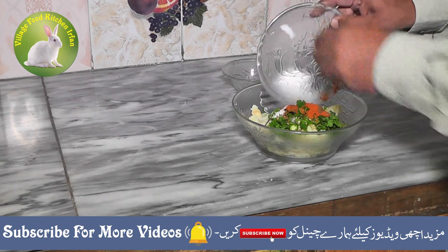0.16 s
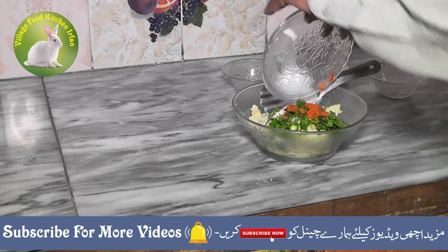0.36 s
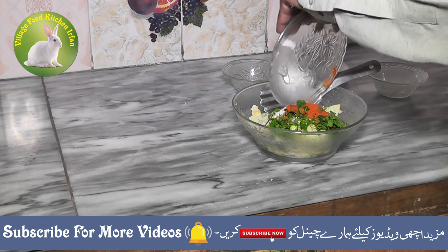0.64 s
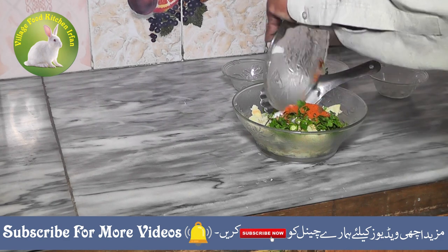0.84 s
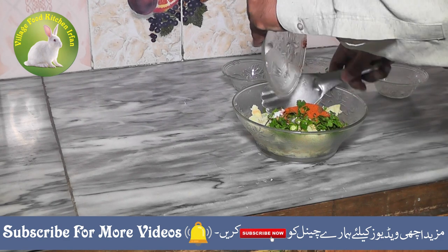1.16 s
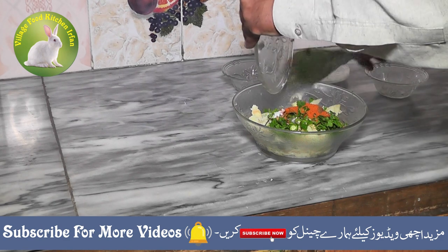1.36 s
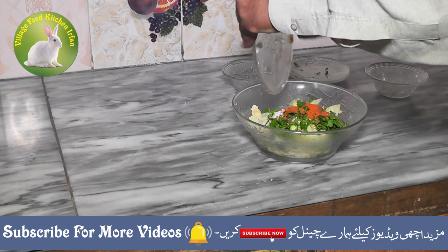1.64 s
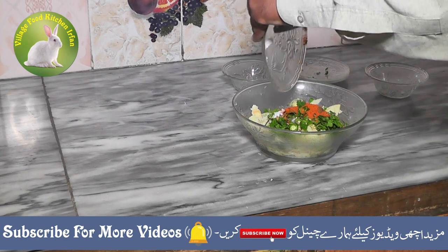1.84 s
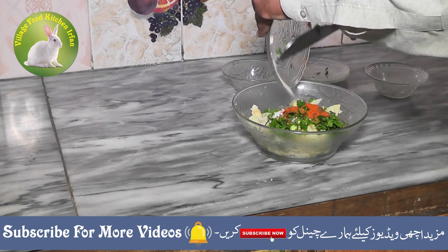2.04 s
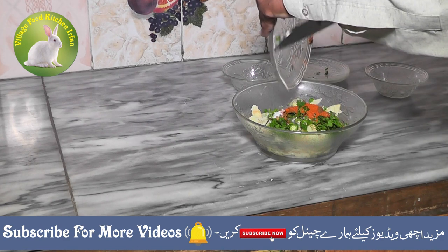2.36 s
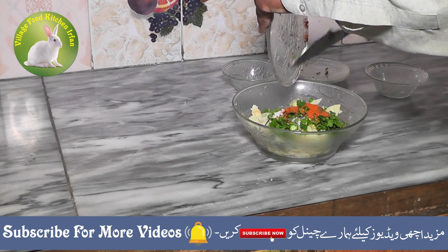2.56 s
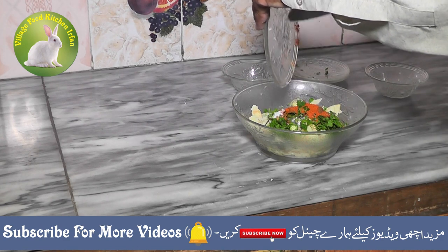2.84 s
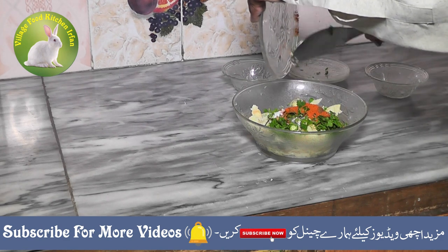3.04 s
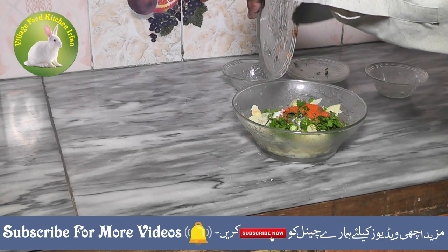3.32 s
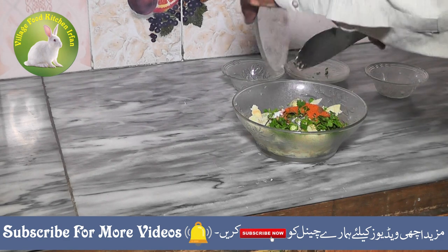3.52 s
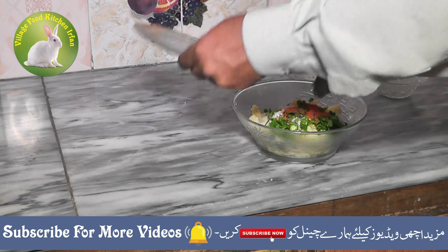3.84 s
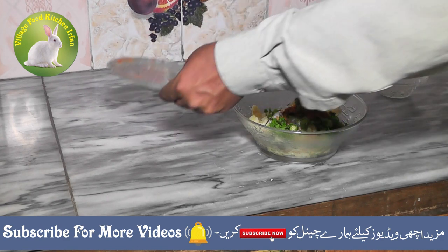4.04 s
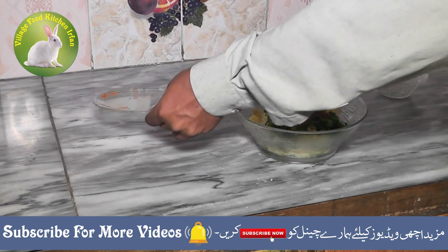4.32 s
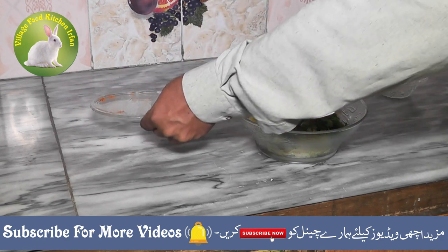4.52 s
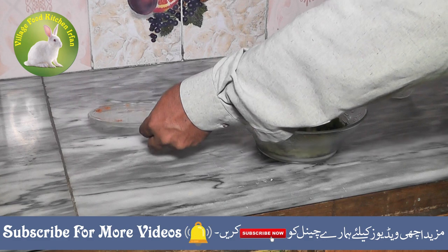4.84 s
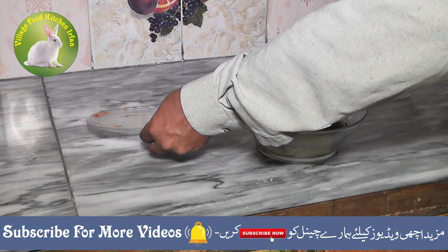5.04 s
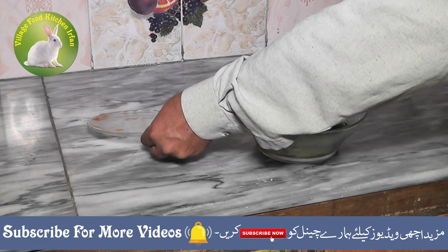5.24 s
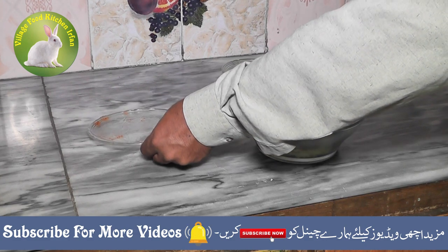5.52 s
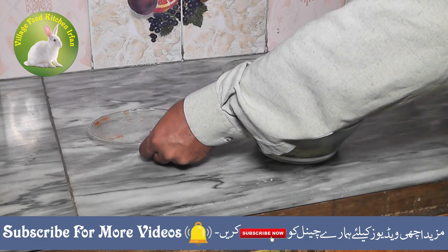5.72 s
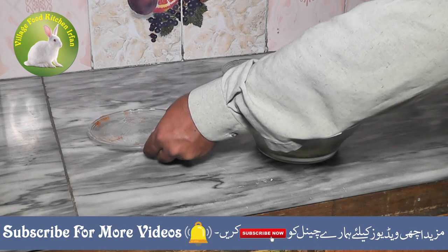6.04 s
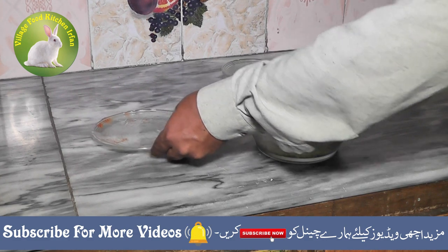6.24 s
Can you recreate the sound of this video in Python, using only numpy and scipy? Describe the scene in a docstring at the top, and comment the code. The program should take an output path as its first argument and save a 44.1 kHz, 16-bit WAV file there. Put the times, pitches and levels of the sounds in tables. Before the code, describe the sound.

In a quiet tiled kitchen, ringing metal-on-glass taps and short scrapes give way to a glass plate landing and rocking on stone.

```python
"""A faint hum and floor noise lie under a tiled kitchen; a sleeve swishes as filtered random slips.
A steel knife knocks a full glass bowl (damped modes, dry thud), and a puff of air bumps the microphone (low noise).
The knife then clinks on and scrapes a hand-held glass plate: decaying modes, blade clink, edge tick, stick-slip grains.
After more swishes the plate lands on a marble counter, then rocks and grinds on its foot amid rustling and dry ticks.
The dishes echo off tile and stone; loud sounds push the recorder's gain down, and it creeps back."""
import sys
import numpy as np
from scipy import signal
from scipy.fft import rfft, irfft, next_fast_len
from scipy.io import wavfile

SR = 44100
rng = np.random.default_rng(int(sys.argv[2]) if len(sys.argv) > 2 else 0)


def transcribe(signal):
    """Save signal, clipped to [-1, 1], as a 16-bit WAV file at the path in sys.argv[1]."""
    frames = np.atleast_2d(signal).T
    limited = np.clip(frames, -1, 1)
    pcm = np.round(limited * 32767).astype(np.int16)
    wavfile.write(sys.argv[1], SR, pcm)


N = 281358
TIME = np.arange(N) / SR
AGE = TIME[:SR * 2 // 5]   # seconds since contact
SPLIT_HZ = 2600   # between low and high modes of a dish


def from_db(db):
    """Decibels to gain."""
    return 10 ** (np.asarray(db) / 20)


def curve(rows, fade_db_per_s):
    """Gain over time from (s, dB) rows, fading away before and after them."""
    s, db = np.transpose(rows)
    outside_s = np.abs(TIME - np.clip(TIME, s[0], s[-1]))
    return from_db(np.interp(TIME, s, db) - fade_db_per_s * outside_s)


def strokes(rows, rise_db_per_s, fall_db_per_s):
    """Gain over time of hand movements: each swells, holds for its length and dies away."""
    levels_db = []
    for s, length_s, db in rows:
        before_s = np.maximum(s - TIME, 0)
        after_s = np.maximum(TIME - s - length_s, 0)
        levels_db.append(db - rise_db_per_s * before_s - fall_db_per_s * after_s)
    return from_db(np.max(levels_db, axis=0))


def coloured(x, spectrum):
    """Shape a signal by (Hz, dB) points joined on a log-frequency axis; rms 1."""
    hz, db = np.transpose(spectrum)
    size = next_fast_len(len(x))
    bins_hz = np.maximum(np.fft.rfftfreq(size, 1 / SR), 1)
    gain = from_db(np.interp(np.log(bins_hz), np.log(hz), db))
    y = irfft(rfft(x, size) * gain, size)[:len(x)]
    return y / np.std(y)


def noise(spectrum):
    """Steady noise of a given colour; rms 1."""
    return coloured(rng.standard_normal(N), spectrum)


def grains(per_s, spread_db):
    """Tiny random slips of uneven size and either sign."""
    sizes = from_db(spread_db * np.minimum(rng.exponential(1, N), 4))
    return (rng.random(N) < per_s / SR) * sizes * rng.choice([-1, 1], N)


def unit_blow(x):
    """Scale a blow to rms 1 over its first fiftieth of a second."""
    return x / np.sqrt(np.mean(x[:SR // 50] ** 2))


def add(track, s, sound):
    """Mix a sound into a track at time s."""
    start = int(s * SR)
    track[start:start + len(sound)] += sound[:N - start]


def ring(hz, t60_s, db, scatter_db):
    """Decaying modes; each contact has its own strengths and phases, and the grip detunes them a little."""
    strength = from_db(db + scatter_db * rng.standard_normal(len(hz)))
    phase = 2 * np.pi * rng.random((len(hz), 1))
    pitch_hz = hz * (1 + 0.0013 * rng.standard_normal(len(hz)))
    waves = np.sin(2 * np.pi * pitch_hz[:, None] * AGE + phase)
    return strength @ (waves * from_db(-60 * AGE / t60_s[:, None]))


def damp(modes, ring_share):
    """Shorten every mode to a share of its free ring time."""
    return modes * np.array([[1], [ring_share], [1]])


def swell(rise_s):
    """The vibration builds up while the contact lasts."""
    return 1 - np.exp(-AGE / rise_s)


def crowd(spectrum, t60_s, rise_s):
    """Modes too many and too damped to tell apart: a coloured burst."""
    burst = coloured(rng.standard_normal(len(AGE)), spectrum)
    return unit_blow(burst * from_db(-60 * AGE / t60_s) * swell(rise_s))


def ping(hz, t60_s):
    """One short mode."""
    return unit_blow(np.sin(2 * np.pi * hz * AGE) * from_db(-60 * AGE / t60_s))


def glass(modes, low_db, high_db, rise_s):
    """A struck dish: the hardness of the contact sets the high modes against the low ones."""
    high = modes[0] > SPLIT_HZ
    low_ring = unit_blow(ring(*modes[:, ~high], scatter_db=1.5) * swell(rise_s))
    high_ring = unit_blow(ring(*modes[:, high], scatter_db=3.5) * swell(rise_s))
    return from_db(low_db) * low_ring + from_db(high_db) * high_ring


def rubbed(slips, modes):
    """Modes kept sounding by a stream of slips, through a response of unit energy."""
    response = ring(*modes, scatter_db=-3.5)
    return signal.fftconvolve(slips, response / np.linalg.norm(response))[:N]


# Floor noise colour. Each row: frequency in Hz, relative density in dB per Hz.
FLOOR_COLOUR = [(12, -21), (20, -1.5), (121, -2.5), (169, -17.5), (242, -2.5), (433, -9), (638, -10.5),
                (889, -11.5), (1350, -16), (1550, -15.5), (2690, -22.5), (4080, -25), (6720, -30.5),
                (13100, -40.5), (15000, -54.5)]
# Faint appliance hum. Each row: frequency in Hz, rms level in dB.
HUM_TONES = [(439, -75.5), (877, -76.5)]


def room_background():
    """Steady coloured noise plus appliance hum as pure tones."""
    hum = sum(from_db(db) * np.sqrt(2) * np.sin(2 * np.pi * hz * TIME) for hz, db in HUM_TONES)
    return from_db(-62.4) * noise(FLOOR_COLOUR) + hum


# Air bumping the microphone. Each row: time in seconds, level in dB.
PUFF_LEVEL = [(1.5, -65), (1.576, -34.5), (1.69, -55), (1.826, -56.5), (1.858, -43), (1.938, -45.5),
              (2.01, -73), (2.084, -54), (2.2, -75)]
# Puff colour. Each row: frequency in Hz, relative density in dB per Hz.
PUFF_SPECTRUM = [(15, -12.5), (28, -3), (52, 1), (80, -9.5), (120, -14), (170, -25.5), (250, -45),
                 (500, -68.5)]


def air_puff():
    """Turbulent air on the microphone: low noise that follows the puff level."""
    return curve(PUFF_LEVEL, fade_db_per_s=300) * noise(PUFF_SPECTRUM)


# Sleeve and sliding spice. Each row: start in seconds, length in seconds, level before mix in dB.
ARM_SWISHES = [(.36, 0.4, -72.5), (3.27, .45, -68), (4.36, 0.051, -69.5), (4.79, 0.055, -64.5),
               (5.15, 0.31, -61), (5.7, 0.75, -64.5)]
# Rustle colour. Each row: frequency in Hz, relative density in dB per Hz.
RUSTLE_SPECTRUM = [(1200, -25), (2200, -1.5), (2700, -8.5), (3500, -1.5), (4400, 2.5), (5600, -4.5),
                   (7200, -7.5), (8700, -15.5), (13000, -15), (14000, -37)]
# Moving arm. Each row: frequency in Hz, relative density in dB per Hz.
RUMBLE_SPECTRUM = [(30, -24.5), (70, -8.5), (110, 3), (165, -16.5), (400, -48)]
SWISH_RISE_DB_PER_S, SWISH_FALL_DB_PER_S = 108, 69.5
SLEEVE_REST_DB = -77   # before mix


def sleeve_and_arm():
    """Dense slips rustle and low noise rumbles, both following the arm's movement."""
    arm = from_db(SLEEVE_REST_DB) + strokes(ARM_SWISHES, SWISH_RISE_DB_PER_S, SWISH_FALL_DB_PER_S)
    rustle = coloured(grains(per_s=21000, spread_db=4.0), RUSTLE_SPECTRUM)
    rumble = noise(RUMBLE_SPECTRUM)
    return arm * (from_db(-3.0) * rustle + from_db(-6.5) * rumble)


# Dry ticks as the plate settles. Each row: time in seconds, level before mix in dB.
DRY_TICKS = [(5.338, -55.5), (5.347, -61), (5.407, -60), (5.417, -53), (5.47, -64), (6.312, -62)]
# Crowded high modes of a tick. Each row: frequency in Hz, relative density in dB per Hz.
TICK_COLOUR = [(4000, -18.5), (6400, 1), (8200, 1.5), (9400, -3.5), (10400, -2), (12200, -1.5),
               (13500, -8.5), (15000, -16.5), (17000, -23.5)]


def dry_ticks():
    """Tiny bright ticks: short high bursts."""
    out = np.zeros(N)
    for s, db in DRY_TICKS:
        add(out, s, from_db(db - 6.0) * crowd(TICK_COLOUR, t60_s=0.033, rise_s=0.00047))
    return out


# Foot grinding on marble. Each row: time in seconds, low ring in dB, treble in dB, both before mix.
FOOT_GRIND = [(5.75, -43, -77), (5.894, -53, -79), (5.972, -47, -74), (5.998, -54, -81),
              (6.184, -63.5, -70), (6.232, -49.5, -71), (6.302, -48.5, -60.5), (6.326, -32, -49),
              (6.38, -36, -50)]


def grind(modes):
    """Grit under the foot feeds small uneven slips into the damped plate; the last push also wakes its high modes."""
    rows = np.array(FOOT_GRIND)
    damped = damp(modes, 0.35)
    high = modes[0] > SPLIT_HZ
    slips = grains(per_s=220, spread_db=2.0)
    slips = slips / np.std(slips)
    low_slips = slips * curve(rows[:, [0, 1]], fade_db_per_s=85)
    high_slips = slips * curve(rows[:, [0, 2]], fade_db_per_s=78.5)
    low_ring = rubbed(low_slips, damped[:, ~high])
    high_ring = rubbed(high_slips, damped[:, high])
    return from_db(-3.0) * low_ring + from_db(1.5) * high_ring


# Crowded modes of the plate's thud. Each row: frequency in Hz, relative density in dB per Hz.
THUD_COLOUR = [(140, -35.5), (200, -22), (245, 1), (290, -3.5), (340, 5.5), (390, -5.5), (550, 4),
               (760, -7), (1000, -0.5), (1280, 9.5), (1420, -3), (1750, -9.5), (2400, -17.5), (3500, -36)]
# High modes of glass on stone, quickly damped. Each row: frequency in Hz, relative density in dB per Hz.
CLATTER_COLOUR = [(2000, -21), (2800, -10), (3250, 13), (3600, -10), (3950, 7.5), (4700, -14), (5300, 1),
                  (5650, -6), (6100, -25), (7300, -23), (7900, -17), (8600, -27), (14000, -42)]


def on_marble(touches, modes, ring_db, knock_db, treble_db, clatter_db, rise_s, ring_share):
    """Stone against glass: a duller blow; resting on the counter shortens the low modes."""
    out = np.zeros(N)
    hz, t60_s, db = modes
    damped = np.array([hz, t60_s * np.where(hz < SPLIT_HZ, ring_share, 1), db])
    for s, low_db, high_db in touches:
        dish = glass(damped, low_db + ring_db, high_db + treble_db, rise_s)
        thud = from_db(low_db + knock_db) * crowd(THUD_COLOUR, t60_s=0.29, rise_s=rise_s)
        clatter = from_db(high_db + clatter_db) * crowd(CLATTER_COLOUR, t60_s=0.11, rise_s=0.00041)
        add(out, s, dish + thud + clatter)
    return out


# Plate landing. Each row: time in seconds, ring in dB, treble in dB, both before mix.
PLATE_LANDINGS = [(5.24, -22.5, -30.5), (5.292, -28.5, -38.5)]


def plate_landing(modes):
    """The plate set down: a quick contact leaves its ring free."""
    return on_marble(PLATE_LANDINGS, modes, ring_db=-1.5, knock_db=-12.5, treble_db=-6.5,
                     clatter_db=-3.0, rise_s=0.00036, ring_share=1.0)


# Plate rocking on its foot. Each row: time in seconds, ring in dB, treble in dB, both before mix.
PLATE_ROCKING = [(5.569, -33.5, -53.5), (5.5971, -29.5, -48), (5.6225, -32, -54), (5.6297, -32, -60),
                 (5.7125, -33.5, -53), (5.7323, -33, -62), (5.8034, -38.5, -64), (5.869, -42.5, -70),
                 (5.9244, -40, -71), (5.9616, -43, -71), (6.0312, -48, -72), (6.2346, -45.5, -58.5),
                 (6.327, -34.5, -45.5), (6.3615, -32.5, -43.5)]


def plate_rocking(modes):
    """The foot chatters: slower contacts, with the low modes cut short by the counter."""
    return on_marble(PLATE_ROCKING, modes, ring_db=-6.5, knock_db=-25, treble_db=-15,
                     clatter_db=-9, rise_s=0.0014, ring_share=0.53)


# Blade over glass. Each row: start in seconds, length in seconds, level before mix in dB.
BLADE_SCRAPES = [(2.46, 0.066, -40), (2.91, 0.096, -53.5), (3.06, 0.031, -42.5), (3.45, 0.24, -58)]
# Crowded modes of the blade's flat. Each row: frequency in Hz, relative density in dB per Hz.
CLINK_COLOUR = [(1200, -38.5), (1900, 2), (2400, -9), (3200, -3.5), (3800, -2.5), (4300, -2.5), (4900, -2),
                (5800, 1.5), (6300, -19.5), (9000, -43)]
SCRAPE_RISE_DB_PER_S, SCRAPE_FALL_DB_PER_S = 499.5, 755


def scrape(modes):
    """The edge catches and slips, exciting blade and plate."""
    pressure = strokes(BLADE_SCRAPES, SCRAPE_RISE_DB_PER_S, SCRAPE_FALL_DB_PER_S)
    slips = grains(per_s=1700, spread_db=-2.5)
    steel = coloured(slips, CLINK_COLOUR) + from_db(-12) * coloured(slips, TICK_COLOUR)
    plate = rubbed(slips / np.std(slips) * pressure, modes)
    return from_db(-1.0) * steel * pressure + from_db(-6.5) * plate


# A harder tap is briefer, so its bright parts grow fastest.
# Each pair: base level in dB for a firm tap, dB gained per dB of force.
LOW_RING, HIGH_RING, THUD = (-32, 0.64), (-35, 0.83), (-40, 0.37)
BLADE_CLINK, EDGE_TICK = (-31.5, 0.92), (-40.5, 1)
EDGE_TILT = 0.28   # dB per octave for each dB of force


def at_force(part, force_db):
    """Level in dB of one part of a tap's sound."""
    firm_db, growth = part
    return firm_db + growth * force_db


def blade(force_db, blade_hz, edge_hz, tone_db, tick_db):
    """The knife's own voice: a clink of the flat and a tick of the edge, brighter when struck harder."""
    edge = [(hz, db + EDGE_TILT * force_db * np.log2(hz / 8000)) for hz, db in TICK_COLOUR]
    clink = crowd(CLINK_COLOUR, t60_s=0.04, rise_s=0.0004) + from_db(tone_db) * ping(blade_hz, t60_s=0.08)
    tick = crowd(edge, t60_s=0.054, rise_s=0.00034) + from_db(-3.5) * ping(edge_hz, t60_s=0.11)
    clink_gain = from_db(at_force(BLADE_CLINK, force_db))
    tick_gain = from_db(at_force(EDGE_TICK, force_db) + tick_db)
    return clink_gain * clink + tick_gain * tick


# Knife on bowl. Each row: time in seconds, force in dB re a firm tap, bowl ring before mix in dB, blade in Hz.
KNOCKS_ON_BOWL = [(1.216, -31.5, -63.5, 4900), (1.23, -8, -46.5, 4884), (1.395, -14, -40.5, 5000),
                  (1.406, -16.5, -41.5, 4660), (1.417, -16.5, -48.5, 5150)]
# Glass bowl damped by its filling. Each row: frequency in Hz, t60 in seconds, relative level in dB.
BOWL_MODES = [(334, 0.137, -1.5), (651, 0.26, -9.5), (727, 0.18, -4), (950, 0.091, -3), (1007, 0.11, 2.5),
              (1275, 0.26, -6.5), (1800, .08, 1), (1950, 0.084, 4.5), (1996, .1, -2.5), (2830, 0.14, -8),
              (3230, 0.054, -3.5), (3950, 0.092, -4), (4730, 0.08, -4.5), (4900, 0.14, -7),
              (5280, 0.12, -9.5), (6010, 0.065, -5.5)]
# Quickly damped modes of the full bowl. Each row: frequency in Hz, relative density in dB per Hz.
BOWL_THUD_COLOUR = [(150, -27), (250, -24), (345, -9), (450, -9.5), (640, -1), (850, -3), (1020, 2.5),
                    (1300, 0), (1600, -5), (2400, -9), (3500, -21)]
BOWL_EDGE_HZ = 7100


def knife_on_bowl():
    """The full bowl answers with a drier, lower knock."""
    out = np.zeros(N)
    modes = np.transpose(BOWL_MODES)
    for s, force_db, low_db, blade_hz in KNOCKS_ON_BOWL:
        dish = glass(modes, low_db + 0.73, force_db - 32, rise_s=0.0003)
        thud = from_db(low_db - 2.0) * crowd(BOWL_THUD_COLOUR, t60_s=0.055, rise_s=0.0005)
        knife = blade(force_db - 2.5, blade_hz, BOWL_EDGE_HZ, tone_db=-3.5, tick_db=2)
        add(out, s, dish + thud + knife)
    return out


# Knife on plate. Each row: time in seconds, force in dB re a firm tap, ring over knock in dB,
# extra high ring in dB, contact in Hz, blade in Hz, edge in Hz, share of the free ring time.
TAPS_ON_PLATE = [(1.878, 8, 5, 0.5, 1914, 5780, 12160, 0.61), (2.3, 11.5, -4.5, -2, 1897, 4847, 7880, 0.58),
                 (2.409, -16.5, -1, 6.5, 1670, 4000, 9730, 0.22),
                 (2.444, -1.5, -0.5, 3.5, 1553, 3990, 6640, .42),
                 (2.827, 3, -1.5, 2, 1833, 4540, 8350, 0.91),
                 (3.003, -27.5, 2.5, 5, 1760, 4480, 8280, 0.84),
                 (3.019, -12, 1, -8, 1675, 4700, 7250, 0.42), (3.042, -8, 1, -2, 1530, 4500, 7040, .35),
                 (3.065, -15, 0.5, -6, 1750, 3924, 7040, 0.4), (3.083, -23, 6, -5, 1688, 5200, 7250, 0.64),
                 (3.312, -44, -5, -8, 1820, 4130, 7010, 1), (3.489, -2, 0, -6.5, 1830, 4930, 7050, 0.6),
                 (3.501, -11.5, 3.5, 6.5, 1670, 5220, 7010, 0.73)]
PRESS_DAMPS_DB, PRESS_TONE_DB = 4.5, 5   # full press: taken from the low ring, added to the contact tone


def knife_on_plate(modes):
    """Each tap rings plate and blade; a blade left pressing damps the plate and adds a brief tone of its own."""
    out = np.zeros(N)
    for s, force_db, ringing_db, extra_high_db, contact_hz, blade_hz, edge_hz, ring_share in TAPS_ON_PLATE:
        pressed = 1 - ring_share
        low_db = at_force(LOW_RING, force_db) + ringing_db
        high_db = at_force(HIGH_RING, force_db) + extra_high_db
        dish = glass(damp(modes, ring_share), low_db - PRESS_DAMPS_DB * pressed, high_db, rise_s=0.0002)
        contact = from_db(low_db - 2.5 + PRESS_TONE_DB * pressed) * ping(contact_hz, t60_s=0.051)
        # a gentle touch lasts longer, so it sounds lower
        softness = np.clip((3 - force_db) / 60, 0, 1)
        body = [(hz, db - 6 * softness * max(np.log2(hz / 500), 0)) for hz, db in THUD_COLOUR]
        thud_gain = from_db(at_force(THUD, force_db) - ringing_db)
        thud = thud_gain * crowd(body, t60_s=0.042, rise_s=0.0012)
        knife = blade(force_db, blade_hz, edge_hz, tone_db=-4.5, tick_db=-0.74)
        add(out, s, dish + contact + thud + knife)
    return out


# Echo off tile and stone. Each row: band centre in Hz, t60 in seconds, relative echo level in dB.
KITCHEN_ECHO = [(150, 0.2, -7.5), (350, 0.36, -2), (875, 0.48, -7.5), (1850, 0.46, -9), (5060, 0.46, -9.5),
                (9000, 0.28, -6), (14000, 0.15, -10.5)]


def kitchen(x):
    """Diffuse echo off tile and stone: noise bands with their own decay, the treble dying faster."""
    hz, t60_s, echo_db = np.transpose(KITCHEN_ECHO)
    age = TIME[:SR]
    bins_hz = np.maximum(np.fft.rfftfreq(SR, 1 / SR), 1)
    white = rfft(rng.standard_normal(SR))
    tail = np.zeros(SR)
    for k, share in enumerate(np.eye(len(hz))):   # overlapping bands that sum to one
        band = irfft(white * np.interp(np.log(bins_hz), np.log(hz), share), SR)
        fade = from_db(-60 * age / t60_s[k]) * (1 - np.exp(-age / 0.0013))
        tail += from_db(echo_db[k]) * band * fade / np.linalg.norm(fade)
    return signal.fftconvolve(x, tail)[:N]


# Glass plate; the point of contact picks the modes. Each row: frequency in Hz, free t60 in seconds,
# relative level in dB under the knife, on landing, on rocking.
PLATE_MODES = [(336, 0.26, -16, -20, -18), (602.3, 0.12, -38, -25, -7), (1005, 0.14, -28, -7, -23),
               (1070, 0.023, -23, 1.5, -15), (1204.4, 0.12, -28.5, -7.5, -9), (1268, 0.18, -20, -13, 0),
               (1305, 0.081, -18.5, -3.5, 7), (1600, 0.18, -6, -8, -30), (1680, 0.05, -9, -5, -32),
               (1841, 0.19, 10, -3.5, -38), (1785, 0.28, -3.5, -2.5, -23), (1801, 0.15, -1, -3.5, -14.5),
               (1890, 0.27, -9.5, -34, -51), (2010, 0.042, -12, -42, -50),
               (2320, 0.065, -17.5, -2.5, -15.5), (3172, 0.32, -8, -22, -24), (3166, 0.082, -1, -11, -23),
               (3660, 0.18, -19, -29, -31), (3930, 0.22, -12.5, -19, -18.5), (3770, 0.081, -13, -6, -23.5),
               (4590, .16, -15, -21, -38.5), (5000, 0.056, -16.5, -43, -52), (5224, .22, -10.5, -7.5, -24),
               (5640, .18, -17.5, -11.5, -24), (5680, .18, -19.5, -28, -31), (5860, 0.29, -17.5, -42, -43),
               (5960, 0.11, -16, -44, -58.5), (7930, .12, -18, -29.5, -39), (10260, 0.18, -22, -45, -55),
               (12060, .16, -26, -58, -60)]


def scene():
    """Dishes and knife in the room, over a quiet background, heard by one microphone."""
    plate = np.transpose(PLATE_MODES)
    tapped, landed, rocked = (np.vstack([plate[:2], db]) for db in plate[2:])
    dishes = dry_ticks() + grind(rocked) + plate_landing(landed) + plate_rocking(rocked)
    dishes += scrape(tapped) + knife_on_bowl() + knife_on_plate(tapped)
    mono = room_background() + air_puff() + sleeve_and_arm() + dishes + kitchen(dishes)
    return np.array([mono, mono])


def gain_control(x, threshold_db, share, release_db_per_s, attack_s):
    """Loud clinks push the gain down; it creeps back over a second or so."""
    level_db = 20 * np.log10(np.abs(x[0]) + 1e-9)
    over_db = np.maximum(level_db - threshold_db, 0) * share
    release_db = release_db_per_s * TIME
    held_db = np.maximum.accumulate(over_db + release_db) - release_db
    pole = np.exp(-1 / (attack_s * SR))
    return x * from_db(-signal.lfilter([1 - pole], [1, -pole], held_db))


CUTOFF_HZ = 15900


def record(dry):
    """The recorder rides its gain and cuts the top steeply."""
    levelled = gain_control(dry, threshold_db=-11.5, share=0.26, release_db_per_s=2.0, attack_s=0.0051)
    top_cut = signal.ellip(10, 0.1, 80, CUTOFF_HZ, fs=SR, output="sos")
    return signal.sosfilt(top_cut, levelled)


dry = scene()
out = record(dry)
transcribe(out)
```